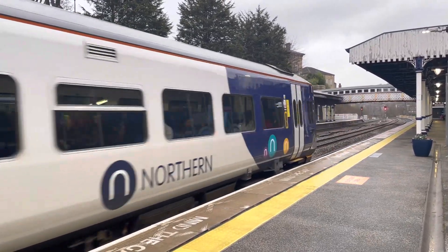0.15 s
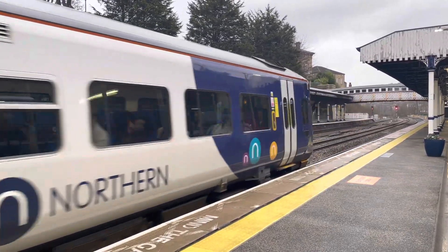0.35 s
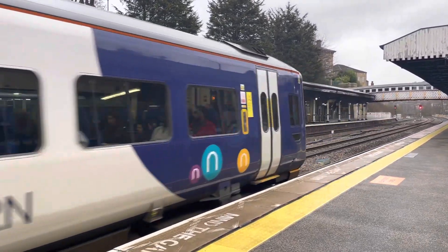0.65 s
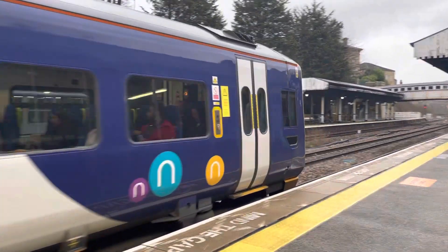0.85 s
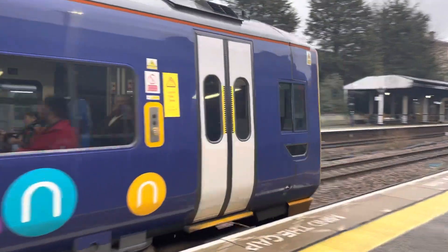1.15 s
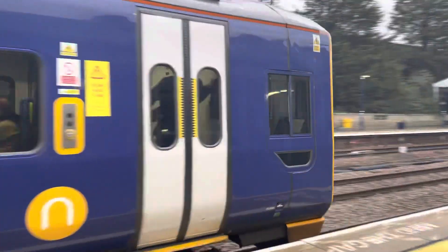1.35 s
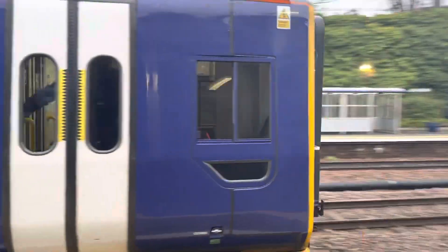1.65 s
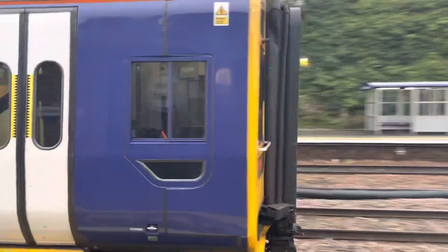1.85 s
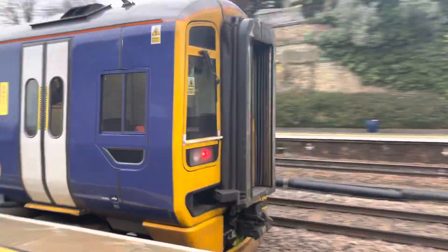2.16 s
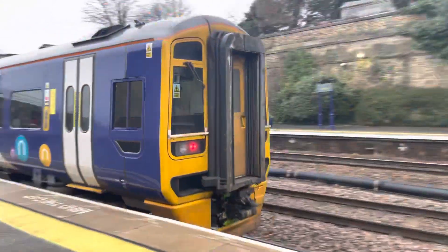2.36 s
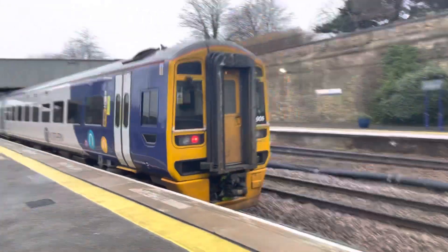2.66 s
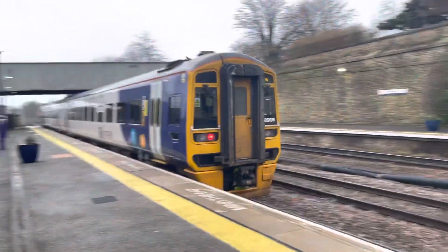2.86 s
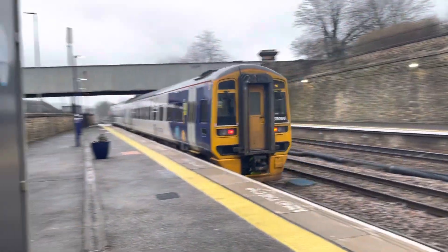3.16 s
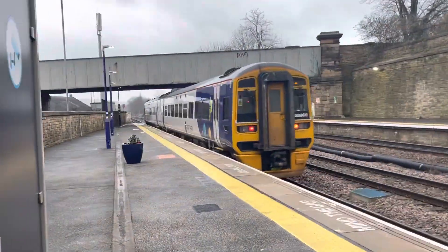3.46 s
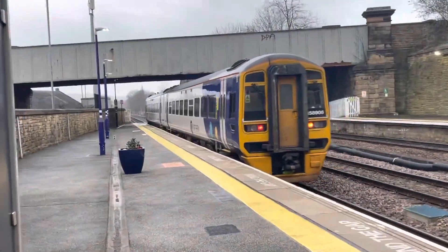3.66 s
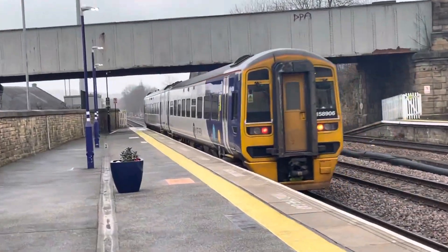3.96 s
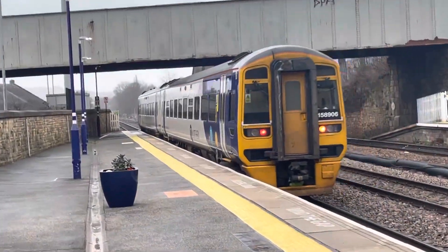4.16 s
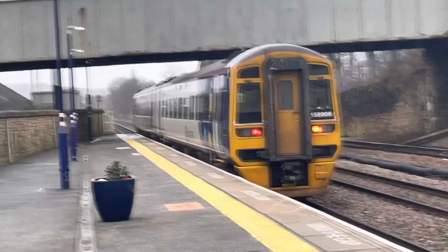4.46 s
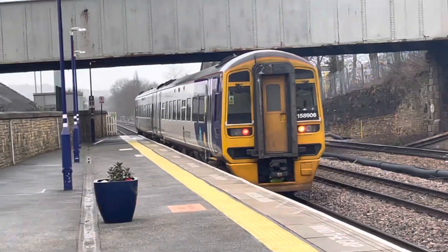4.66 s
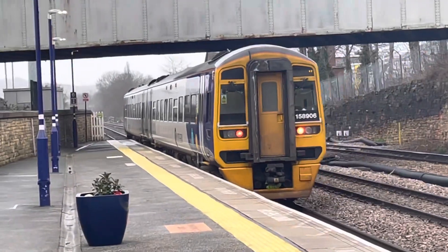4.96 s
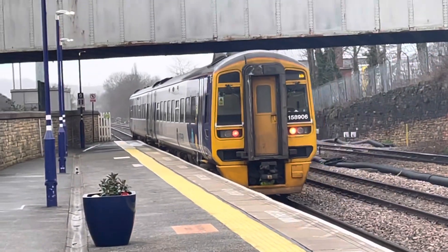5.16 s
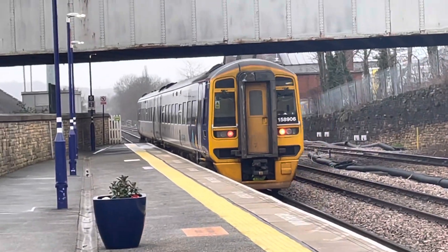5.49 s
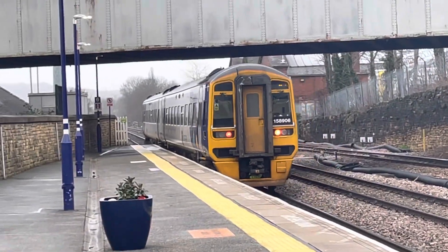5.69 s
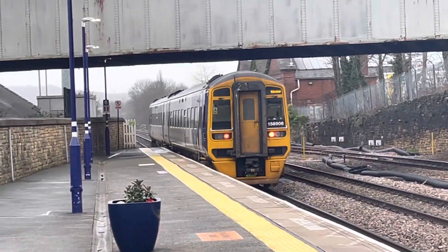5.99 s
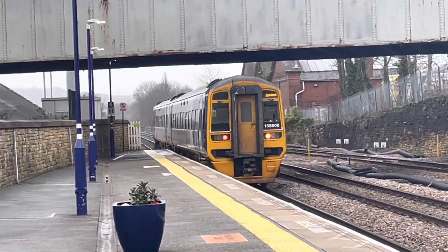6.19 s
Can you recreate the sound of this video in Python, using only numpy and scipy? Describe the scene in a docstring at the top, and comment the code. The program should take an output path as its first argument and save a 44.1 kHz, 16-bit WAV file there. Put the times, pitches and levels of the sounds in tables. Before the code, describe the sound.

Outdoors on a station platform, stereo microphone close to the track. From 0 s a departing two-car diesel train is alongside: a deep low engine drone near 80 Hz, two engines beating about twice a second, with fluttering gear tones, block clatter, rough whine, churning roar and hiss. Low gusty rumble, like wind on the microphone, swells around 1.2 s. At 0.97 s a heavy thump with smaller jolts, and again at 1.3 s, as the last wheels cross a rail joint; a faint one at 1.8 s. Around 1.7-2 s the tail clears and shrill whine flares briefly. From 2.1 to 3.6 s the sound swings from left to ahead, hollower and quieter. Short thin wheel squeals near 3-3.4 s; a steel bridge throws sound back until about 5 s. The drone pulses on, and from 5.3 s engine pitch rises steadily to the 6.3 s end, still receding.

```python
"""The drone of two six-cylinder diesels throbs about twice a second as a two-car train pulls out along a platform.
Firing tones beat; gear and whine partials follow engine speed; shaped noise makes gusty rumble, roar and hiss.
Its tail passes close on the left with thumps of the last bogie over a rail joint, then it recedes ahead.
A steel bridge throws sound back, a wheel sings in short rubs, and near the end the engines pick up speed."""
import sys
import numpy as np
from scipy import signal
from scipy.fft import rfft, irfft, next_fast_len
from scipy.io import wavfile

SR = 44100
rng = np.random.default_rng(int(sys.argv[2]) if len(sys.argv) > 2 else 0)


def pcm_store(signal):
    """Save signal as 16-bit PCM."""
    levels = np.round(np.clip(np.atleast_2d(signal), -1, 1) * 32767)
    wavfile.write(sys.argv[1], SR, levels.astype(np.int16).T)


N = 279153
TIME = np.arange(N) / SR
SIZE = next_fast_len(N)
BIN_HZ = np.maximum(np.fft.rfftfreq(SIZE, 1 / SR), 1)
SIDE_LAG_S = 0.000436   # right ear behind left for sound from the left


def from_db(db):
    """Decibels to amplitude gain."""
    return 10 ** (np.asarray(db) / 20)


def rms(x):
    """Root mean square."""
    return np.sqrt(np.mean(np.abs(x) ** 2) + 1e-20)


def in_time(rows):
    """Each value column of a time table, interpolated at every sample."""
    time_s, *columns = np.transpose(rows)
    return [np.interp(TIME, time_s, column) for column in columns]


def at_hz(points, hz):
    """Read a table on a log-frequency axis."""
    freqs, values = np.transpose(points)
    return np.interp(np.log(hz), np.log(freqs), values)


def drift(rate_hz):
    """Slow random waver with rms 1, from low-passed noise made at SR / 40."""
    pole = np.exp(-80 * np.pi * rate_hz / SR)
    noise = rng.standard_normal(N // 40 + 2002)
    slow = signal.lfilter([1], [1, -2 * pole, pole * pole], noise)[2000:]
    return np.interp(np.arange(N) / 40, np.arange(len(slow)), slow / rms(slow))


def turning(rate_hz):
    """Phase in radians of something that repeats at this rate."""
    return 2 * np.pi * np.cumsum(rate_hz) / SR


def swell(start_s, attack_s, hold_s, release_db_per_s):
    """Envelope that rises to 1, holds and dies away exponentially."""
    t = TIME - start_s
    release_s = np.maximum(t - attack_s - hold_s, 0)
    return np.clip(t / attack_s, 0, 1) * from_db(-release_db_per_s * release_s)


TRAIN_M_PER_S = 9
# sound thrown back by the steel bridge: start_s, attack_s, hold_s, release_db_per_s
BRIDGE_SWELL = (3.1996, 0.61, 1.32, 34)


def passing(level, closest_s, distance_m):
    """Gain of a part rolling by: direct sound falls with distance; wall reflections change under the bridge."""
    direct_db, returned_db, fade_db_per_s, bridge_db = level
    nearness = distance_m / np.hypot(distance_m, TRAIN_M_PER_S * (TIME - closest_s))
    returned = from_db(returned_db - fade_db_per_s * TIME + bridge_db * swell(*BRIDGE_SWELL))
    return np.hypot(from_db(direct_db) * nearness, returned)


def underfloor(level):
    """Gain of machinery under the last car, which passes the listener early."""
    return passing(level, closest_s=0.09, distance_m=2.8)


def partials(phase, orders, ahead, steady, spread):
    """Shaft-locked tones: steady direct part, plus reflections that blur each line and differ between ears."""
    out = np.zeros((2, N))
    width = spread * (1 - ahead / 2)
    for multiple, db, width_hz in orders:
        shared = steady + (drift(width_hz) + 1j * drift(width_hz)) / np.sqrt(2)
        apart = width * (drift(width_hz) + 1j * drift(width_hz))
        waver = np.array([shared + apart, shared - apart], np.complex64)
        # ears come into step as the train moves ahead
        mean_rad_per_s = multiple * phase[-1] / TIME[-1]
        late = np.angle(np.exp(1j * mean_rad_per_s * SIDE_LAG_S)) * (1 - ahead)
        left = multiple * phase % (2 * np.pi)
        angle = np.array([left, left - late], np.float32)
        tone = waver.real * np.cos(angle) - waver.imag * np.sin(angle)
        out += from_db(db) * np.sqrt(2) / rms(waver) * tone
    return out


# slower engine's firing tone: time_s, level_db
FIRING_TONE = [(0.0, -18.7), (1.0, -20.6), (1.35, -24.3), (2.0, -28), (2.55, -33), (2.85, -23.7),
               (3.3, -22.3), (4.15, -21), (4.85, -28.5), (5.18, -27), (5.33, -18.5), (5.5, -25.5),
               (5.85, -25), (6.33, -29.5)]
# slower engine's octave of the firing tone: time_s, level_db
FIRING_OCTAVE = [(0.0, -30.5), (1.0, -26.5), (1.4, -37), (1.95, -29), (2.1, -22.5), (2.35, -19.5),
                 (3.0, -26), (4.5, -30), (4.95, -25.5), (5.5, -33.5), (6.33, -31)]
# exhaust overtones: firing_multiple, alongside_db, ahead_db, width_hz
EXHAUST_ORDERS = [(2 / 3, -11, -11, 0.6), (4 / 3, -6.5, -6.5, 3.474), (8 / 3, 0.5, -3.5, 1.2),
                  (3, -16, -2, 1.2), (11 / 3, -8, -5.5, 3.4), (4, -3, -13, 2.5)]
# overtones: direct_db, returned_db, fade_db_per_s, bridge_db
OVERTONE_LEVEL = (-44, -32.5, 0.97, 4.5)
# roar behind the train once its tail has gone by: start_s, attack_s, hold_s, release_db_per_s
HOLLOW_ROAR = (2.3905, 0, 0.3, 8.5)
FASTER_FIRING_DB = -1.5   # re slower engine
FASTER_OCTAVE_DB, HOLLOW_ROAR_DB = -34.5, -36.5


def exhaust(slower, faster, ahead):
    """Two engines' firing tones and octaves beat; uneven cylinders add overtones on the crankshaft's rate."""
    (firing_db,), (octave_db,) = in_time(FIRING_TONE), in_time(FIRING_OCTAVE)
    # bass reflected off the car side puts the ears slightly out of step
    skew = 0.14 * (1 - ahead / 2) * np.array([[1], [-1]])
    firing_pair = np.sin(slower + skew) + from_db(FASTER_FIRING_DB) * np.sin(faster + skew)
    boom = from_db(firing_db + 1.1 * drift(5.2)) * firing_pair
    slower_octave = from_db(octave_db + 1.2 * drift(11)) * np.sin(2 * (slower + skew))
    # slips half a cycle as the train moves ahead
    faster_octave = from_db(FASTER_OCTAVE_DB) * np.sin(2 * (faster + skew) - np.pi * ahead)
    orders = [(multiple, near_db + (far_db - near_db) * ahead, width_hz)
              for multiple, near_db, far_db, width_hz in EXHAUST_ORDERS]
    overtones = underfloor(OVERTONE_LEVEL) * partials(slower, orders, ahead, steady=1.6, spread=0.45)
    blurred = partials(slower, [(9.1, 0.0018, 75.0)], ahead, steady=0, spread=0.33)
    hollow = from_db(HOLLOW_ROAR_DB) * swell(*HOLLOW_ROAR) * blurred
    return np.sqrt(2) * (boom + slower_octave + faster_octave) + overtones + hollow


# gear tones: firing_multiple, level_db, width_hz
GEAR_ORDERS = [(2, 1.5, 3.188), (4, -4.5, 2.2), (8, 2.3, 5.6), (9.5, -9, 7), (11.98, 0, 9), (16.03, 0, 24),
               (20, -7.5, 22)]
# gear tones: direct_db, returned_db, fade_db_per_s, bridge_db
GEAR_LEVEL = (-30.2, -45, 0.782, 0)
# gear flutter: depth at once, depth at twice the crankshaft's rate
GEAR_SHAKE = (.35, .35)
# rough whine: firing_multiple, level_db, width_hz
WHINE_ORDERS = [(23.85, 0, 28), (25.51, -0.5, 85)]
# rough whine: time_s, level_db
WHINE = [(0, -38), (.35, -38), (.8, -50), (1.7, -48), (2.07, -41), (2.3, -47), (2.9, -52), (3.5, -50),
         (3.8, -42), (4.4, -44.5), (5.08, -41.5), (5.5, -45.5), (6.33, -45)]
# shrill whine: firing_multiple, level_db, width_hz
SHRILL_ORDERS = [(41.3, -12, 70), (48.15, -1, 55), (49.4, -6.5, 55)]
# highest whine: firing_multiple, unscreened_db, width_hz
SHRILL_OCTAVE = (72.3, -5, 290)
# shrill whine: direct_db, returned_db, fade_db_per_s, bridge_db
SHRILL_LEVEL = (-37.5, -43.3, 1.7, 4.2)
# shrill lift as the tail clears: start_s, attack_s, hold_s, release_db_per_s
TAIL_CLEARS = (1.7, 0.19, .05, 18)
TAIL_SHRILL_DB = 3.5


def transmission(phase, ahead):
    """Gear tones flutter with the crankshaft; rough whines carry on; shrill ones flare and narrow to the centre."""
    whine_db, = in_time(WHINE)
    once, twice = GEAR_SHAKE
    # three firings per crankshaft turn
    shake = 1 + once * np.cos(phase / 3 + drift(3)) + twice * np.cos(2 * phase / 3 + drift(3))
    gear_tones = partials(phase, GEAR_ORDERS, ahead, steady=1.3 - ahead, spread=0.49)
    gears = underfloor(GEAR_LEVEL) * shake * gear_tones
    whine = from_db(whine_db) * partials(phase, WHINE_ORDERS, ahead, steady=0.45, spread=0.31)
    # the car body screens the highest whine until the tail has cleared
    multiple, db, width_hz = SHRILL_OCTAVE
    octave = (multiple, db - 4 * np.clip(TAIL_CLEARS[0] - TIME, 0, 1), width_hz)
    shrill_tones = partials(phase, SHRILL_ORDERS + [octave], ahead, steady=.15, spread=.45 * (1 - ahead))
    flare = from_db(TAIL_SHRILL_DB * swell(*TAIL_CLEARS))
    return gears + whine + flare * underfloor(SHRILL_LEVEL) * shrill_tones


# engine block: direct_db, returned_db, fade_db_per_s, bridge_db
GROWL_LEVEL = (-27.5, -50, 2, -1)


def growl(phase):
    """Block clatter repeats each crankshaft turn of three firings: a dense comb of partials, late at the right ear."""
    turn = np.linspace(0, 1, 256, endpoint=False)
    clatter = rng.standard_normal(len(turn)) * (1 + .5 * np.cos(6 * np.pi * turn))
    block = signal.butter(3, [480, 1700], "band", fs=SR, output="sos")
    sound = signal.sosfilt(block, np.interp(phase / (6 * np.pi), turn, clatter, period=1))
    sound = underfloor(GROWL_LEVEL) * from_db(1.8 * drift(9)) * sound / rms(sound)
    return np.array([sound, np.interp(TIME - SIDE_LAG_S, TIME, sound)])


DIRECT_TOP_HZ = 6500


def noise_field(spectrum, correlation, balance, direct_share):
    """Spectra of coloured noise in two channels: a scattered part, and a direct part late on the right."""
    alike = np.clip(at_hz(correlation, BIN_HZ), -.99, .99)
    mid, side, direct = rfft(rng.standard_normal((3, SIZE)))
    mid, side = np.sqrt((1 + alike) / 2) * mid, np.sqrt((1 - alike) / 2) * side
    scattered = np.array([mid + side, mid - side])
    direct = direct * np.exp(-2j * np.pi * BIN_HZ * SIDE_LAG_S * np.array([[0], [1]]))
    # the finest hiss arrives mostly by reflection
    share = np.clip(direct_share, 0, 1) / (1 + (BIN_HZ / DIRECT_TOP_HZ) ** 4)
    tilt_db = at_hz(balance, BIN_HZ) * np.array([[.5], [-.5]])
    colour = from_db(at_hz(spectrum, BIN_HZ) + tilt_db)
    return colour * (np.sqrt(1 - share) * scattered + np.sqrt(share) * direct)


# relative noise spectra: freq_hz, density_db_per_hz
ALONGSIDE = [(20, -79), (38, -55), (56, -41), (115, -45), (160, -52.5), (240, -52), (305, -48.5),
             (400, -52), (500, -53), (850, -54), (1600, -61.5), (2300, -64.5), (3200, -68.5), (4500, -71),
             (5400, -81), (7000, -86), (8600, -92.5), (10500, -93.5), (12600, -85.5)]
AHEAD = [(20, -83), (38, -65), (58, -45), (140, -55), (280, -55.5), (500, -59), (780, -60), (1600, -70.5),
         (2200, -73), (3750, -72), (4200, -79.5), (7000, -87.5), (8600, -79.5), (10500, -83),
         (12600, -77.5)]
# correlation of the two channels' noise, opposed around 8 kHz: freq_hz, correlation
ALONGSIDE_CORRELATION = [(60, .96), (280, .9), (600, .25), (1300, .43), (1900, -1), (2500, .55),
                         (4300, .85), (7000, 1), (7600, -1), (9100, -1), (10400, 1), (12500, .6)]
AHEAD_CORRELATION = [(60, .96), (280, .88), (700, .78), (1300, .62), (1850, .25), (2400, 1), (5800, 1),
                     (7000, .83), (7550, -1), (9100, -1), (10100, 1), (11000, .8)]
# channel balance: freq_hz, left_minus_right_db
ALONGSIDE_BALANCE = [(430, 0), (710, 2.5), (1160, -3.5), (1900, -3.5), (3100, 0), (5000, -0.5)]
AHEAD_BALANCE = [(260, 0), (430, 1.8), (710, 1), (1160, 4), (1900, 0.5), (5000, -2)]


def noise_fields():
    """Noise alongside, partly direct, and ahead, all scattered."""
    near = noise_field(ALONGSIDE, ALONGSIDE_CORRELATION, ALONGSIDE_BALANCE, direct_share=0.46674)
    far = noise_field(AHEAD, AHEAD_CORRELATION, AHEAD_BALANCE, direct_share=0)
    return near, far


def noise_band(fields, ahead, low_hz, high_hz):
    """One noise band, power-crossfaded from alongside to ahead; each field is levelled first."""
    window = 1 / np.sqrt((1 + (low_hz / BIN_HZ) ** 16) * (1 + (BIN_HZ / high_hz) ** 16))
    near, far = (irfft(field * window, SIZE)[:, :N] for field in fields)
    return np.sqrt(1 - ahead) * near / rms(near.mean(0)) + np.sqrt(ahead) * far / rms(far.mean(0))


# low gusty rumble, probably wind on the microphone: time_s, level_db
RUMBLE = [(0.0, -35), (0.22, -36), (0.45, -27.5), (0.8, -25.5), (1.2, -21), (1.55, -23.5), (1.8, -29),
          (2.2, -29), (2.65, -32.5), (2.85, -25), (3.6, -27), (4.25, -31), (4.45, -22.5), (4.75, -29.5),
          (4.95, -25.5), (5.35, -23), (5.65, -30.5), (5.95, -38), (6.33, -36)]
# bogie: direct_db, returned_db, fade_db_per_s, bridge_db
BOGIE_LEVEL = (-32.8, -28.6, 0.57, -1.2)


def rumble_and_bogie(fields, ahead):
    """Gusty low rumble, plus bogie noise that swells as the bogie passes."""
    rumble_db, = in_time(RUMBLE)
    rumble = from_db(rumble_db + 0.9 * drift(9)) * noise_band(fields, ahead, 15, 164.0)
    bogie_gain = passing(BOGIE_LEVEL, closest_s=1.6, distance_m=2.9)
    bogie = bogie_gain * from_db(1.8 * drift(21.06)) * noise_band(fields, ahead, 159, 480)
    return rumble + bogie


# machinery noise: direct_db, returned_db, fade_db_per_s, bridge_db
ROAR_LEVEL = (-30.5, -35.3, 0.2, -1.6)
RASP_LEVEL = (-34, -42, 0, 0.2)
HISS_LEVEL = (-34.5, -44, -0.35, 1.5)
FINE_HISS_LEVEL = (-44, -53.5, 1.2, 1)
CHURN_DB = 0.75   # rms waver, independent for roar and rasp


def machinery_noise(fields, phase, ahead):
    """Churning roar, rasp and hiss, pulsing at the firing rate and half of it."""
    firing = 1 + .07 * np.cos(phase) + .03 * np.cos(phase / 2)
    roar = underfloor(ROAR_LEVEL) * from_db(CHURN_DB * drift(12)) * noise_band(fields, ahead, 524, 975)
    rasp = underfloor(RASP_LEVEL) * from_db(CHURN_DB * drift(12)) * noise_band(fields, ahead, 1118, 2050)
    hiss = underfloor(HISS_LEVEL) * from_db(0.8 * drift(9.7)) * noise_band(fields, ahead, 2140.0, 7000)
    fine = underfloor(FINE_HISS_LEVEL) * from_db(.5 * drift(7)) * noise_band(fields, ahead, 8060, 12000)
    return firing * (roar + rasp + hiss + fine)


# wheels striking the joint and the bogie jolting after: start_s, peak_db, pitch_hz, ring_re_peak_db
THUMPS = [(0.9707, -2, 268, -14), (0.990, -9.5, 295, -7), (1.0115, -10, 255, -7), (1.063, -9, 99, -22),
          (1.136, -11.5, 250, -8), (1.2385, -12.5, 225, -16), (1.247, -17, 88, -22), (1.3092, -1, 283, -19),
          (1.329, -10, 320, -12), (1.3675, -12.5, 280, -14), (1.453, -14.5, 89.5, -23),
          (1.776, -15, 280, -14)]
# wheel and axle at each blow: low_hz, high_hz
CLANK_BAND_HZ = (450, 930)
THUMP_CYCLES = 3.1
THUMP_SAG = .25   # share by which pitch starts high and ends low
RING_T60_S, RING_DELAY_S = 0.26, 0.019
TICK_DB, TICK_T60_S, TICK_HZ = -25, 0.06, 1800   # level re blow
CLANK_DB, CLANK_T60_S = -26, 0.14   # level re blow


def rail_joint():
    """Each blow: faint steel tick, clank and short solid pulse; bogie and platform wall ring on after it."""
    out = np.zeros((2, N))
    t = TIME[:SR // 2]
    clank_band = signal.butter(2, CLANK_BAND_HZ, "band", fs=SR, output="sos")
    for start_s, db, hz, ring_db in THUMPS:
        done = np.minimum(hz * t / THUMP_CYCLES, 1)
        cycles = THUMP_CYCLES * (done + THUMP_SAG * done * (1 - done) - .5)
        pulse = -np.cos(2 * np.pi * cycles) * np.cos(np.pi * cycles / THUMP_CYCLES) ** 2
        ring_band = signal.butter(3, [hz * 0.724, hz * 1.29], "band", fs=SR, output="sos")
        ring = signal.sosfilt(ring_band, rng.standard_normal(len(t)))
        dying = np.minimum(t / RING_DELAY_S, 1) ** 2 * from_db(-60 * t / RING_T60_S)
        ring = from_db(ring_db) * dying * ring / rms(ring)
        clank = signal.sosfilt(clank_band, rng.standard_normal(len(t)))
        clank = from_db(CLANK_DB - 60 * t / CLANK_T60_S) * clank / rms(clank)
        blow = from_db(db) * (pulse + clank + ring)
        # the tick is low-passed noise, separate at each ear
        tick = signal.lfilter(*signal.butter(2, TICK_HZ, fs=SR), rng.standard_normal((2, len(t))))
        tick = from_db(db + TICK_DB - 60 * t / TICK_T60_S) * tick / rms(tick)
        first = round(start_s * SR)
        out[:, first:first + len(t)] += blow + tick
    return out


# short rubs: start_s, hold_s, level_db
WHEEL_SONG = [(2.98, .07, -41.5), (3.11, .05, -43.5), (3.23, .025, -39.5), (3.33, .07, -47)]
# wheel modes: pitch_multiple, level_db, width_hz
WHEEL_MODES = [(1, 0, 45), (1.753, -10, 70)]
WHEEL_HZ, WHEEL_ATTACK_S, WHEEL_RELEASE_DB_PER_S = 1906, .035, 220


def singing_wheel(ahead):
    """The flange catches and slips on the rail; two wheel modes ring with a rough, wavering tone."""
    ringing = partials(turning(WHEEL_HZ + 4 * drift(25)), WHEEL_MODES, ahead, steady=2.6, spread=.6)
    rubs = sum(from_db(db) * swell(start_s, WHEEL_ATTACK_S, hold_s, WHEEL_RELEASE_DB_PER_S)
               for start_s, hold_s, db in WHEEL_SONG)
    return rubs * ringing


# faster engine: time_s, firing_rate_hz
SPEED = [(0, 82.5), (.9, 82.2), (2.4, 82.1), (3.3, 81.5), (4.4, 81.5), (5.3, 82), (5.7, 84), (6.05, 87),
         (6.33, 88)]
# slower engine's lag, the rate of the throb: time_s, beat_hz
BEAT = [(0, 2.11), (1, 1.96), (1.6, 1.88), (2.1, 1.92), (2.5, 2.5), (3.8, 2.34), (5.2, 2.52), (5.8, 2.11),
        (6.33, 1.58)]
# bearing: time_s, share_from_straight_ahead
BEARING = [(0, 0.00756), (2.1, 0.018), (2.7, 0.52), (3.1, 0.72), (3.6, 1), (6.33, 1)]


def scene():
    """The whole train and the rumble; the bass is a little stronger on the right."""
    (speed,), (beat,) = in_time(SPEED), in_time(BEAT)
    slower, faster = turning(speed - beat), turning(speed)
    ahead = np.clip(in_time(BEARING)[0], 0, 1)
    fields = noise_fields()
    bass = exhaust(slower, faster, ahead) + rumble_and_bogie(fields, ahead) + rail_joint()
    treble = transmission(faster, ahead) + growl(faster)
    treble = treble + machinery_noise(fields, slower, ahead) + singing_wheel(ahead)
    rightward = np.array([[-1], [1]])
    return bass * from_db(0.89 * rightward) + treble * from_db(0.02767 * rightward)


CUTOFF_HZ = 13200


def record(dry):
    """The highest peaks are rounded and the top is cut steeply."""
    rounded = dry / (1 + (dry / .95) ** 8) ** (1 / 8)
    return signal.sosfilt(signal.ellip(10, .1, 80, CUTOFF_HZ, fs=SR, output="sos"), rounded)


dry = scene()
out = record(dry)
pcm_store(out)
```